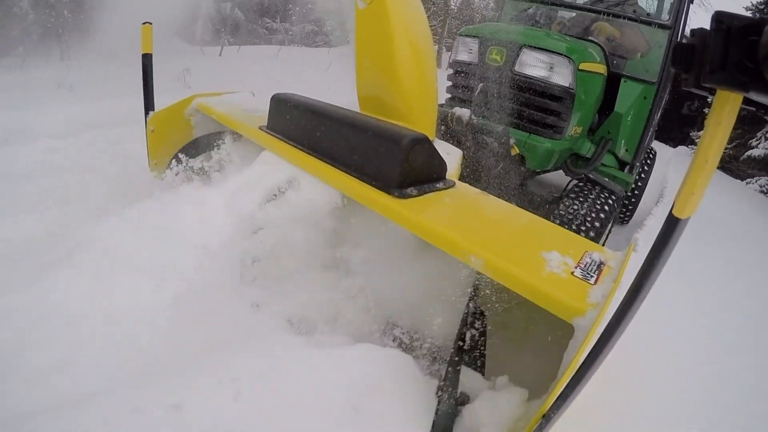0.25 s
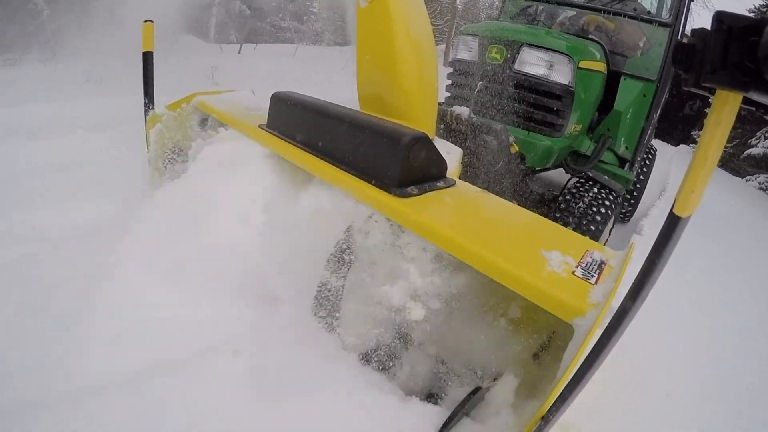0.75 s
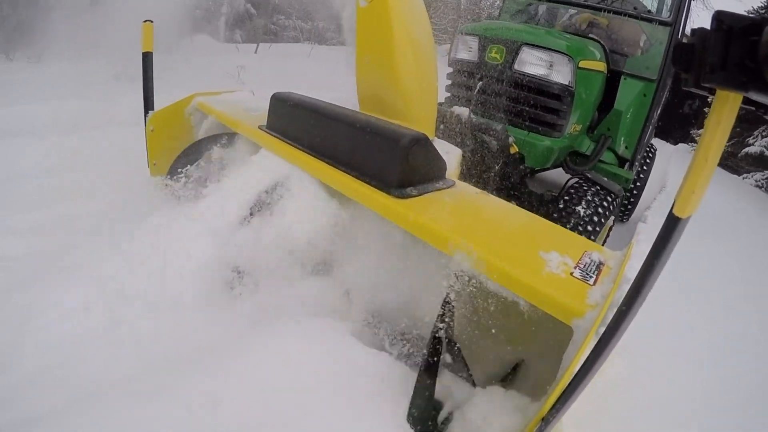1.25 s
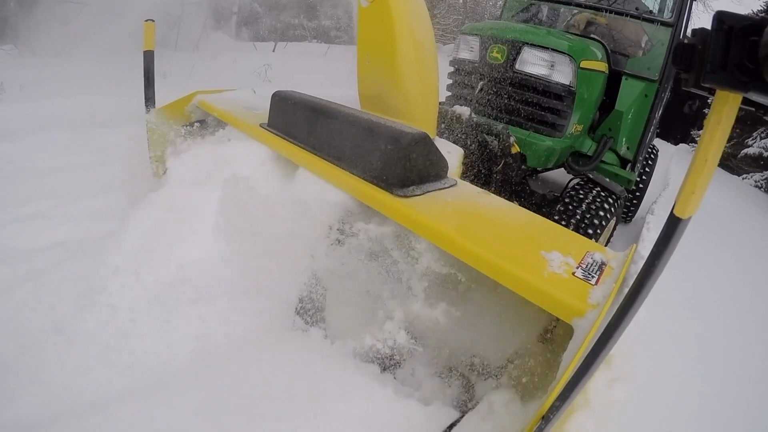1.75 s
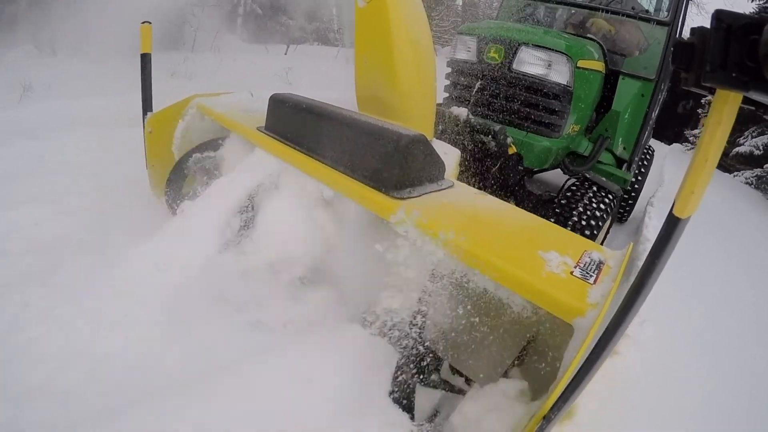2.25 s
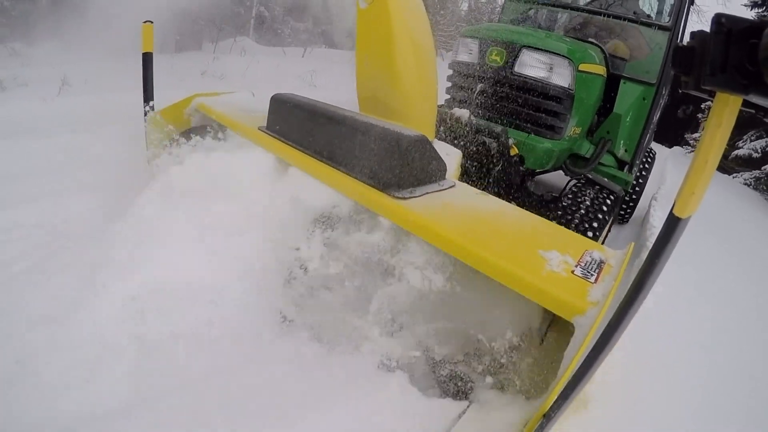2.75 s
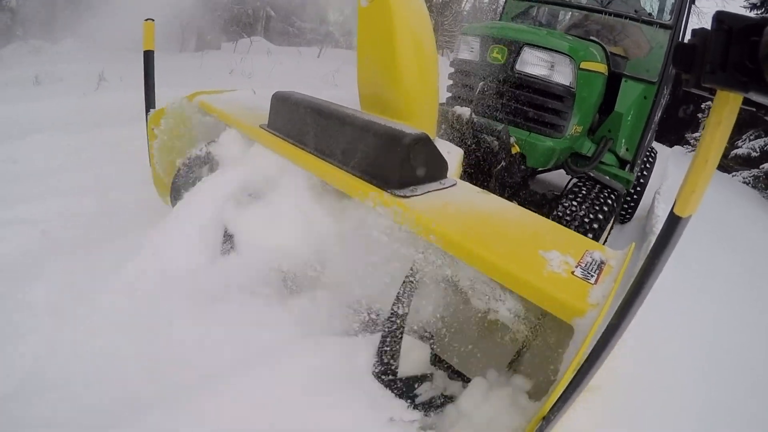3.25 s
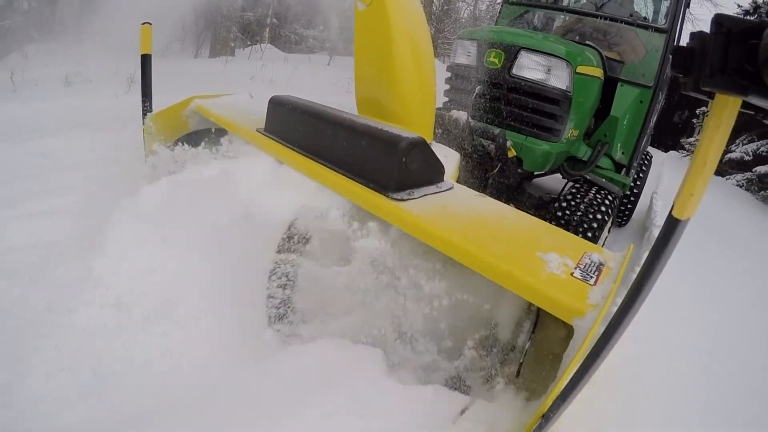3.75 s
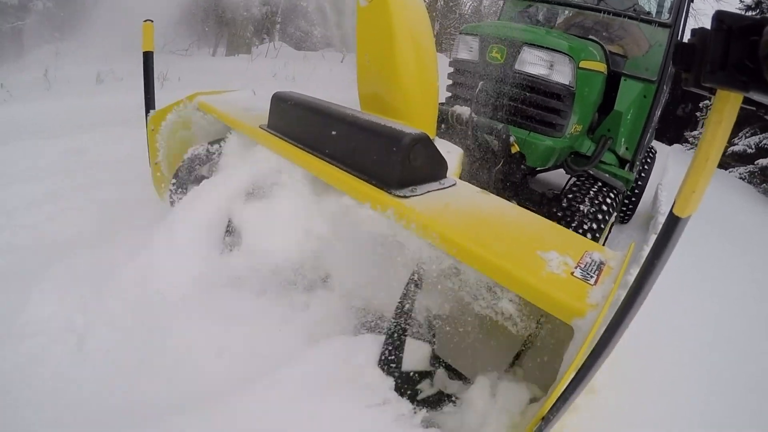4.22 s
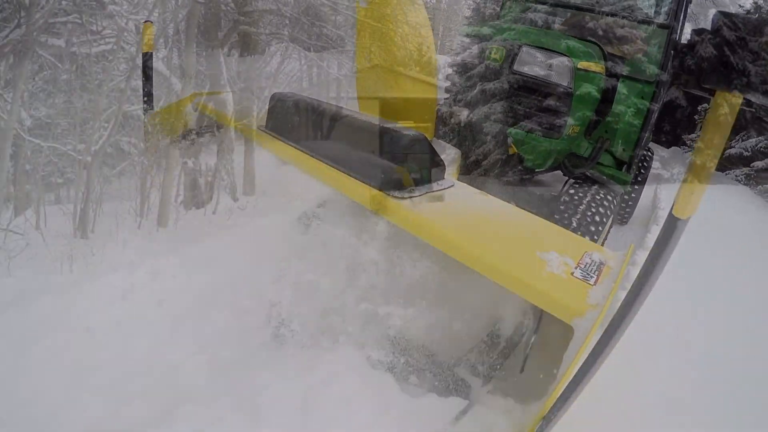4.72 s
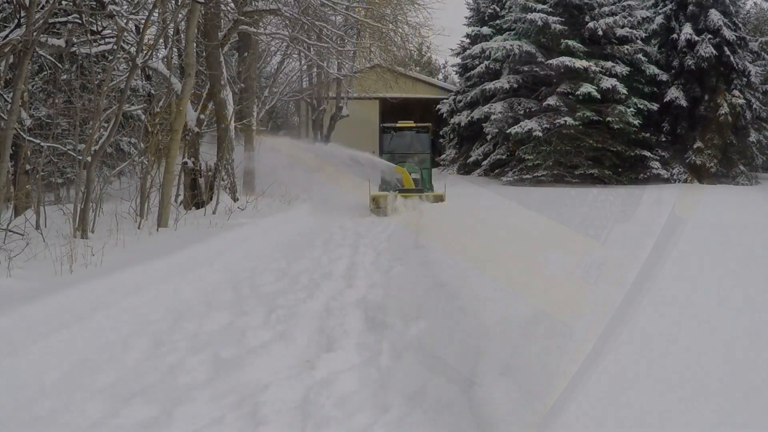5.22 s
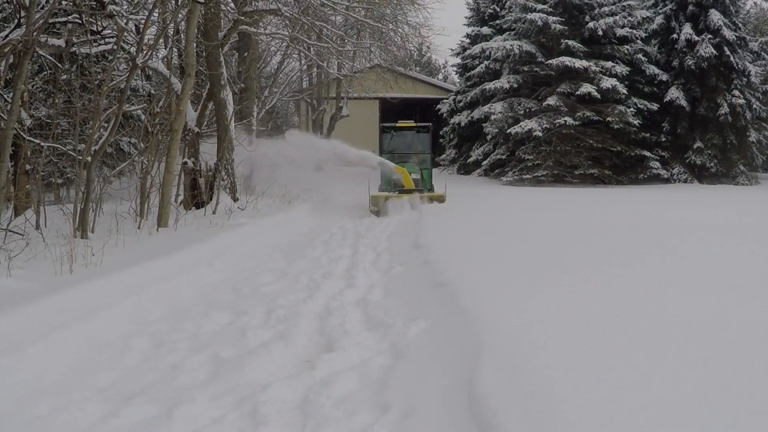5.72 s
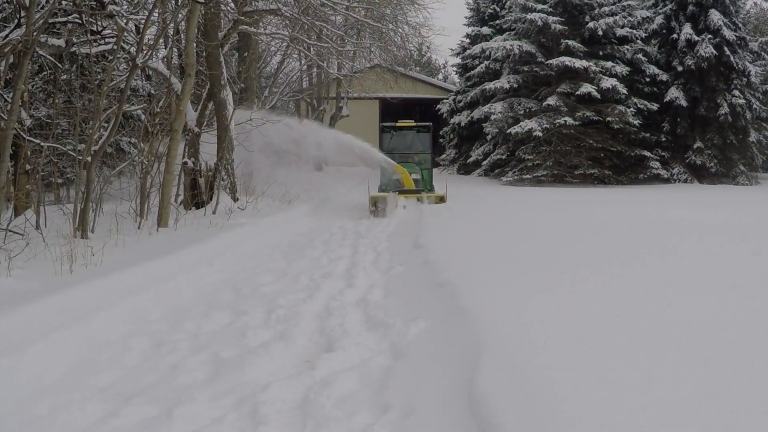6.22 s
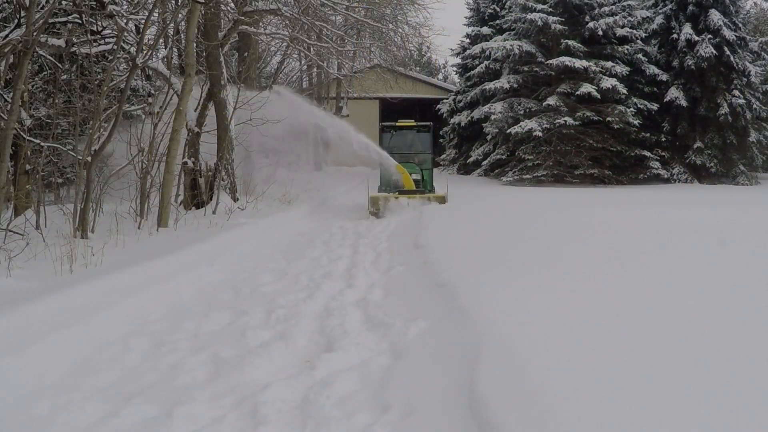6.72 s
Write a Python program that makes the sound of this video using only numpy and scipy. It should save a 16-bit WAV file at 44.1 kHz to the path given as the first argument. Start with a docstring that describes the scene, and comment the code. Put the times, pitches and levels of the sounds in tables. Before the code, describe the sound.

A snowblower runs hard, very close and loud, its deep buzzing hum throbbing about three times a second over a broad snowy rush, with metallic chain whine, panel rattle and diesel firing. It then dissolves to the same machine far down a snowy track, soft and dull, droning with regular pulsing thuds that grow a little, plus two tiny ice ticks close to the microphone.

```python
"""A small three-cylinder diesel tractor drives a front snowblower through deep snow.
First, heard from the blower housing: three impeller blades knock and slap snow, auger flights make the
hum throb, the drive chain whines and rattles steel panels, and the engine fires over a rush of snow.
Then a crossfade to far down the track: the tractor drones and draws nearer, each load of snow thuds
out of the chute as a run of air pushes, and near the end two ice grains tick close by."""
import sys
import numpy as np
from scipy import signal
from scipy.fft import rfft, irfft
from scipy.io import wavfile
from scipy.ndimage import uniform_filter1d, minimum_filter1d

SR = 44100
rng = np.random.default_rng(int(sys.argv[2]) if len(sys.argv) > 2 else 0)


def to_wav(s):
    """Save 16-bit WAV."""
    ch = np.atleast_2d(s).T  # columns
    pcm = np.round(np.clip(ch, -1, 1) * 32767)  # PCM
    wavfile.write(sys.argv[1], SR, pcm.astype(np.int16))


N = 307377
T = np.arange(N) / SR

# turns per blade pass: engine cycle, drive shaft, chain teeth, chain loop, auger flights
ENGINE, SHAFT, TEETH, LOOP, AUGER = 1 / 1.7935, 40 / 57, 40 / 3, 40 / 156, 1 / 16.21


def amp(db):
    """Decibels to gain."""
    return 10 ** (np.asarray(db) / 20)


def evened(x):
    """Scales to rms 1."""
    return x / np.sqrt(np.mean(x ** 2) + 1e-20)


def drift(hz):
    """Slow random wander of rms 1, up to about hz."""
    f = np.fft.rfftfreq(N, 1 / SR)
    spectrum = rfft(rng.standard_normal(N)) * np.exp(-(f / hz) ** 2)
    return evened(irfft(spectrum, N))


def colour(x, gain_at, size=8192):
    """Minimum-phase filter giving white noise of rms 1 the density gain_at(Hz)."""
    f = abs(np.fft.fftfreq(size, 1 / SR))
    log_gain = np.log(gain_at(f) * np.sqrt(SR / 2) + 1e-6)
    ring = np.fft.ifft(np.exp(np.conj(signal.hilbert(log_gain)))).real[:size // 2]
    return signal.oaconvolve(x, ring)[:N]


def shaped(x, spectrum):
    """Colours x with a smooth spectrum, interpolated over log frequency."""
    hz, db = np.transpose(spectrum)
    return colour(x, lambda f: amp(np.interp(np.log(f + 1), np.log(hz), db)))


def rung(x, modes):
    """Colours x with steep-sided resonances, at half amplitude 0.62 widths off centre."""
    def gain_at(f):
        peaks = (amp(db) / (1 + ((f - hz) / (0.62 * width)) ** 2) for hz, width, db in modes)
        return np.sqrt(sum(peak ** 2 for peak in peaks))
    return colour(x, gain_at)


def turns_of(hz, rise_hz_per_s, start_s):
    """Blade passes counted from start_s at a slowly changing speed."""
    t = T - start_s
    return t * (hz + rise_hz_per_s * t / 2)


def strikes(turns, spread_db):
    """One click a turn, each of its own strength."""
    clicks = np.diff(np.floor(turns), prepend=np.floor(turns[0]))
    return clicks * amp(spread_db * np.clip(rng.standard_normal(N), -2, 1.5))


def swing(turns, depth):
    """Gain that swells once a turn."""
    return 1 + depth * np.cos(2 * np.pi * turns)


def burst(turns, length):
    """Gain that jumps once a turn and decays with a constant of length turns."""
    return evened(np.exp(-(turns % 1) / length))


def tone(turns, db, flutter, flutter_hz):
    """Sine that flutters in strength and phase."""
    coarse = np.linspace(0, T[-1], int(2 * flutter_hz * T[-1]) + 2)
    rows = rng.standard_normal((2, 1024))
    a, b = (np.interp(T, coarse, np.resize(row, len(coarse))) for row in rows)
    angle = 2 * np.pi * (turns + rng.random())
    return amp(db) * np.sqrt(2) * (1 + flutter * a) * np.cos(angle + flutter * b)


# pressure pulse of one blade, as a steady train: (frequency [Hz], density [dB/Hz])
PULSE_SPECTRUM = [(40, -88), (110, -51), (170, -54), (250, -48), (350, -48.5), (480, -56), (700, -57.5),
                  (1100, -95.5), (3000, -110)]
# snow slapped by each blade: (frequency [Hz], density [dB/Hz])
SLAP_SPECTRUM = [(40, -75.5), (130, -49), (280, -56), (450, -57), (800, -63), (2000, -83), (8000, -120)]


def impeller(blade):
    """Each of three unequal blades knocks past the chute and slaps snow into it."""
    unequal = swing(blade / 3, depth=0.33)
    clicks = strikes(blade + .015 * drift(25), spread_db=2.0)
    knock = shaped(evened(clicks * unequal), PULSE_SPECTRUM)
    spray = rng.standard_normal(N) * burst(blade, length=0.097)
    slap = shaped(evened(spray * unequal), SLAP_SPECTRUM)
    return knock + slap


# impeller hum: (multiple of blade rate, level [dB], throb depth [0-1], throb crest [s], sway [cycles])
NEAR_HUM_TONES = [(1, -17.5, 0.4, 0.3, 0.046), (2, -23, 0.58, 0.17, .14)]
FAR_HUM_TONES = [(1, -39.5, .7, 5.43, .08), (2, -47, .4, 5.43, 0.11)]


def hum(blade, tones, unequal):
    """Air pumped by three unequal blades, choked and released as each auger flight passes the mouth."""
    out = np.zeros(N)
    for k, db, depth, crest_s, sway in tones:
        auger = AUGER * (blade - np.interp(crest_s, T, blade))
        cycles = round(k) * blade - sway * np.sin(2 * np.pi * auger)
        waver = amp(.5 * drift(5) + .6 * drift(35))
        out += amp(db) * waver * np.sqrt(2) * swing(auger, depth) * np.cos(2 * np.pi * cycles)
    return out * swing(blade / 3, unequal)


def thuds(blade, push_s, idle_db):
    """In each load, every blade shoves out a slug of snow, one of three hardest: air push, then pull."""
    load = (amp(idle_db) + loads(blade)) * swing(blade / 3, depth=.55)
    u = np.arange(-512, 513) / SR / push_s
    push_pull = -u * np.exp((1 - u ** 2) / 2)
    shoves = strikes(blade + .04 * drift(25), spread_db=1.5) * load
    slugs = signal.oaconvolve(shoves, push_pull, "same")
    return signal.sosfilt(signal.butter(1, 25, "high", fs=SR, output="sos"), slugs)


# LOAD_DB holds at LOAD_S; growth adds to the rise of the whole far view
LOAD_S, LOAD_LENGTH_S, LOAD_DB, LOAD_GROWTH_DB_PER_S = 5.615, 0.046, -24.5, 3.5


def loads(blade):
    """Each auger flight feeds the impeller a swell of snow, growing as the tractor comes on."""
    flights = AUGER * (blade - np.interp(LOAD_S, T, blade))
    away_s = (flights - np.round(flights)) / (AUGER * FAR_BLADE_HZ)
    peak = amp(LOAD_DB + LOAD_GROWTH_DB_PER_S * (T - LOAD_S))
    return peak * np.exp(-(away_s / LOAD_LENGTH_S) ** 2)


# steel panels: (frequency [Hz], width [Hz] as scaled in rung, density [dB/Hz])
GUARD_MODES = [(679, 69, -47.5), (765, 61, -47.5), (933, 87, -49), (1183.6, 82, -46), (1359, 126, -56),
               (1530, 187, -60), (1686, 60, -60.5)]  # sheet-metal chain guard
HOUSING_MODES = [(2057, 84, -49.5), (2386, 157, -48), (2535, 116, -54.5), (2780, 106, -58.5),
                 (3017, 160, -60)]  # auger housing
CHUTE_MODES = [(542, 112, -47.5), (3350, 99, -64.5), (3660, 86, -67.5), (3886, 120, -67),
               (4245, 170, -69.5), (4630, 204, -68), (4930, 170, -70), (5730, 295, -71.5)]
# chain whine before WHINE_TRIM_DB: (time [s], level [dB])
WHINE_LEVEL = [(0.1, -27), (0.37, -30), (1.5, -24), (2.51, -26), (4.4, -26.5)]
WHINE_TRIM_DB = 1


def chain(blade):
    """The drive chain whines and sets three panels rattling."""
    guard = rattle(blade, GUARD_MODES, shake=.22, lag=.22, lap=.18)
    housing = rattle(blade, HOUSING_MODES, shake=.18, lag=.6, lap=.05)
    chute = rattle(blade, CHUTE_MODES, shake=.12, lag=.4, lap=.07)
    whine_db = WHINE_TRIM_DB + np.interp(T, *np.transpose(WHINE_LEVEL))
    return guard + housing + chute + amp(whine_db) * whine(blade, eccentric=0.57, lag=0.19)


def rattle(blade, modes, shake, lag, lap):
    """Rollers buzz a panel, hardest at one drive shaft angle and once each lap of the chain."""
    tension = swing(SHAFT * blade - lag, shake) * swing(LOOP * blade - .75, lap)
    tension = tension * swing(3 * ENGINE * blade - lag, depth=0.037)  # firings
    rollers = evened(strikes(TEETH * blade + .3 * drift(300), spread_db=3) * rng.standard_normal(N))
    return rung(evened(tension * (.35 * rollers + rng.standard_normal(N))), modes)


# further chain tones, one at twice the whine: (multiple of drive shaft rate, level re whine [dB])
CHAIN_TONES = [(34, -17), (38, -17.5)]


def whine(blade, eccentric, lag):
    """Teeth mesh on a sprocket slightly out of true, adding a tone one shaft turn higher."""
    mesh = np.exp(2j * np.pi * TEETH * blade + .2j * drift(8)) * amp(.7 * drift(10))
    wobble = np.exp(2j * np.pi * (SHAFT * blade - lag) + .4j * drift(7.2))
    sideband = eccentric * amp(2 * drift(15)) * wobble
    shaft_tones = sum(tone(round(k) * SHAFT * blade, db, flutter=0.6, flutter_hz=11)
                    for k, db in CHAIN_TONES)
    return (np.sqrt(2) * (mesh * (1 + sideband)).real + shaft_tones) * swing(LOOP * blade, depth=0.08)


# exhaust and block tones: (multiple of engine cycle rate, near level [dB], far level [dB])
EXHAUST_TONES = [(2, -34, -52), (3, -25, -40.5), (6, -35, -46), (9, -32, -50.5), (10, -42, -57),
                 (12, -37, -56.5), (13, -37.5, -49), (14, -38.5, -57), (16, -42, -54), (18, -43.5, -53.5),
                 (19, -40, -53), (21, -40.5, -63), (22, -39, -51), (24, -35.5, -56), (27, -35.5, -46),
                 (28, -44, -54.5), (29, -60, -57.5)]


def engine(blade, column, flutter):
    """Firing tones, with others between them from unequal cylinders."""
    return sum(tone(round(row[0]) * ENGINE * blade, row[column], flutter, flutter_hz=7)
               for row in EXHAUST_TONES)


# engine block and hood: (frequency [Hz], width [Hz] as scaled in rung, density [dB/Hz])
BLOCK_MODES = [(603, 150, -65.5), (787, 55, -72.5), (1170, 290, -82), (2720, 300, -77.5), (3020, 320, -78),
               (3720, 200, -89), (4860, 150, -82.5), (5350, 130, -91), (6800, 810, -99)]


def diesel_knock(blade):
    """Noise swelling with each firing rings the block and the hood."""
    firing = swing(3 * ENGINE * blade, depth=0.23)
    return rung(evened(rng.standard_normal(N) * firing), BLOCK_MODES)


# churning snow and machine rush: (frequency [Hz], density [dB/Hz])
NEAR_RUSH_SPECTRUM = [(12, -74), (26, -56), (36, -41.5), (60, -44.5), (85, -44), (190, -51.5), (450, -54),
                      (750, -56), (1050, -64.5), (1850, -67.5), (3500, -71.5), (5400, -76), (6200, -82),
                      (6900, -86.5), (8800, -95.5), (14000, -94.5)]
FAR_RUSH_SPECTRUM = [(12, -79), (42, -63), (80, -62), (150, -62), (205, -74), (300, -66.5), (680, -72),
                     (900, -79.5), (1650, -88.5), (2100, -83.5), (3500, -87), (4700, -87), (5900, -99),
                     (8500, -109), (14000, -108)]


def rush(blade, spectrum, clatter, patchy_db):
    """Churned snow and fan air: noise pulsing with the firings."""
    gate = swing(3 * ENGINE * blade, clatter) * amp(patchy_db * drift(28))
    return shaped(evened(rng.standard_normal(N) * gate), spectrum)


# ice grains, envelope before the high-pass: (time [s], peak level [dB])
ICE_TICKS = [(6.0706, -41), (6.6164, -42)]


def ice(decay_s):
    """Ice grains tick close by: tiny decaying bursts of high-passed noise."""
    envelope = sum(amp(db) * (T >= s) * np.exp(-abs(T - s) / decay_s) for s, db in ICE_TICKS)
    highpass = signal.butter(2, 6500, "high", fs=SR, output="sos")
    return signal.sosfilt(highpass, envelope * rng.standard_normal(N))


NEAR_BLADE_HZ, NEAR_RISE_HZ_PER_S = 49.77, .043


def near():
    """The machine heard from its own housing, gaining a little speed."""
    blade = turns_of(NEAR_BLADE_HZ, NEAR_RISE_HZ_PER_S, start_s=.0008)
    blower = hum(blade, NEAR_HUM_TONES, unequal=0.17) + impeller(blade) + chain(blade)
    snow = rush(blade, NEAR_RUSH_SPECTRUM, clatter=0.16, patchy_db=0.9)
    return engine(blade, 1, flutter=0.29) + blower + snow


# FAR_BLADE_S: one pass of the hardest blade
FAR_BLADE_HZ, FAR_RISE_HZ_PER_S, FAR_BLADE_S = 50.63, -.15, 5.6197


def far():
    """The machine, sagging in speed, across soft snow that swallows the middle range."""
    blade = turns_of(FAR_BLADE_HZ, FAR_RISE_HZ_PER_S, start_s=FAR_BLADE_S)
    blower = hum(blade, FAR_HUM_TONES, unequal=.1) + thuds(blade, push_s=.0021, idle_db=-40.5)
    snow = rush(blade, FAR_RUSH_SPECTRUM, clatter=.12, patchy_db=.4)
    return engine(blade, 2, flutter=0.36) + diesel_knock(blade) + blower + snow


def ramp(zero_s, full_s):
    """Straight fade between silence and full level."""
    return np.clip((T - zero_s) / (full_s - zero_s), 0, 1)


FADE_OUT_S, FADE_OUT_END_S, FADE_IN_S, FADE_IN_END_S = 4.33, 5.31, 4.4, 5.22
NEAR_DB, FAR_DB, APPROACH_DB_PER_S = 0.05, 0.18, 0.6


def scene():
    """The close view dissolves into the distant one, where the tractor slowly draws nearer."""
    close = amp(NEAR_DB) * ramp(FADE_OUT_END_S, FADE_OUT_S)
    approach = amp(FAR_DB + APPROACH_DB_PER_S * (T - FADE_IN_END_S))
    distant = approach * ramp(FADE_IN_S, FADE_IN_END_S)
    return (close * near() + distant * far() + ice(decay_s=0.00092))[None]


EDGE_HZ = 15280


def record(dry):
    """A limiter eases down the highest peaks; then a low-pass at EDGE_HZ."""
    safe_gain = np.minimum(1, .9 / (abs(dry) + 1e-9))
    limited = dry * uniform_filter1d(minimum_filter1d(safe_gain, size=181), size=181)
    lowpass = signal.firwin(511, EDGE_HZ, window=("kaiser", 9), fs=SR)
    return signal.oaconvolve(limited, lowpass[None], "same")


dry = scene()
out = record(dry)
to_wav(out)
```